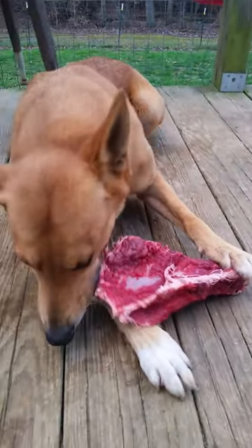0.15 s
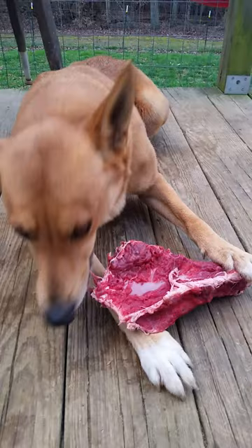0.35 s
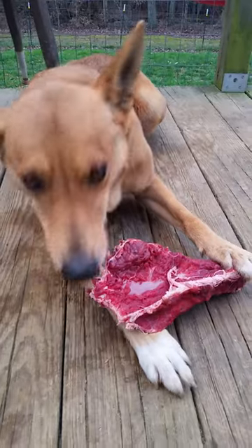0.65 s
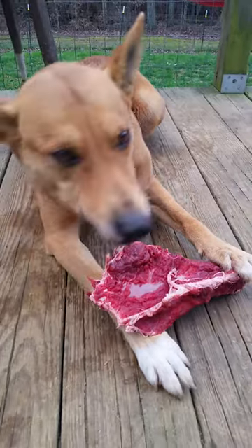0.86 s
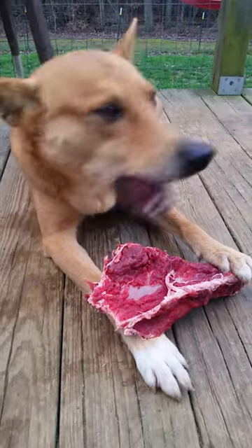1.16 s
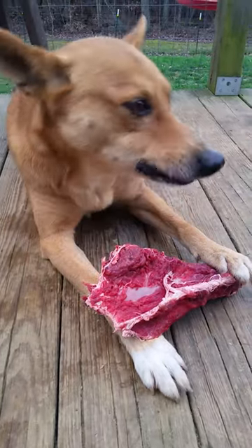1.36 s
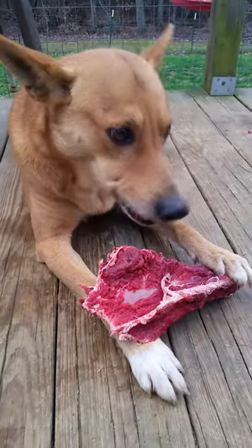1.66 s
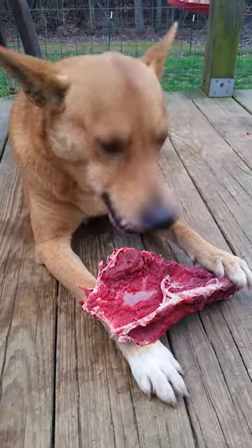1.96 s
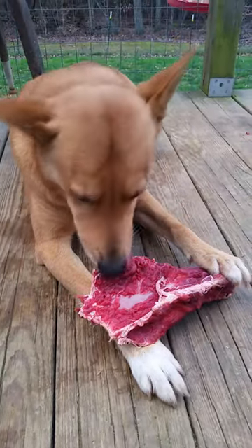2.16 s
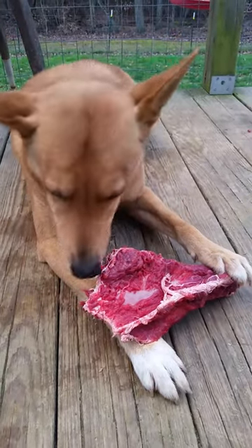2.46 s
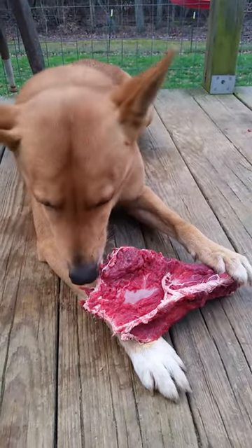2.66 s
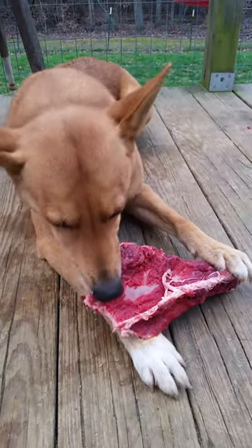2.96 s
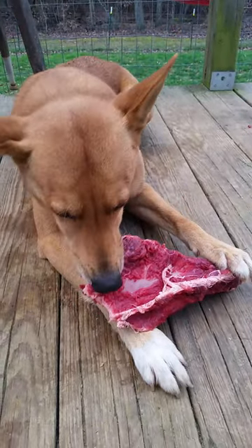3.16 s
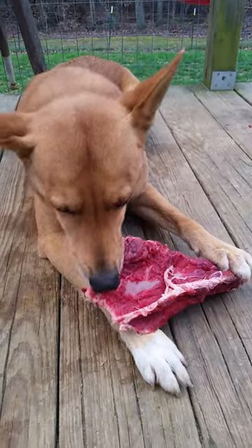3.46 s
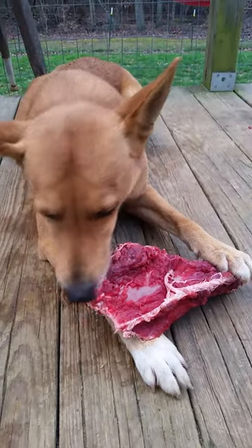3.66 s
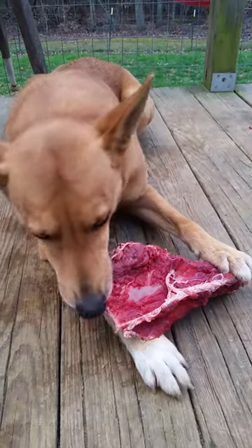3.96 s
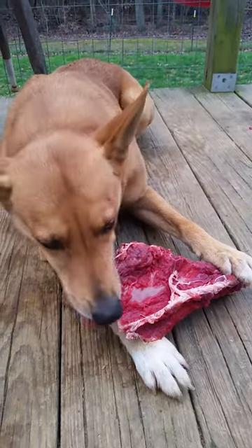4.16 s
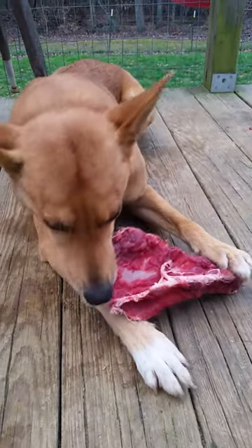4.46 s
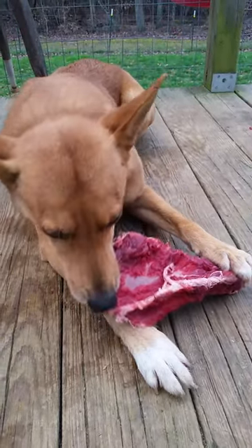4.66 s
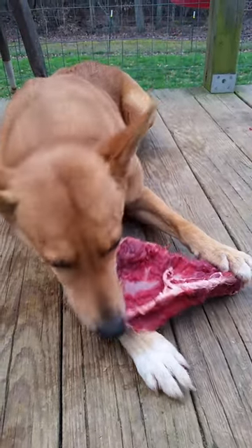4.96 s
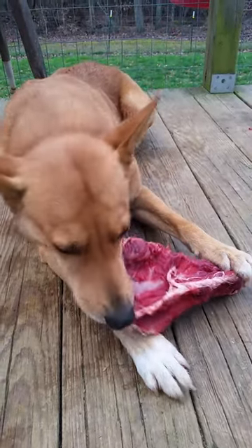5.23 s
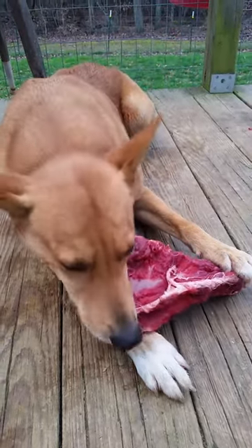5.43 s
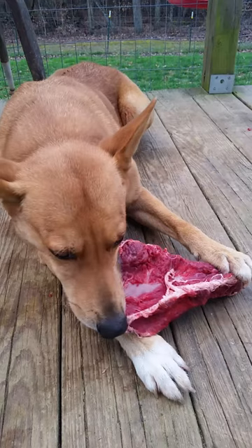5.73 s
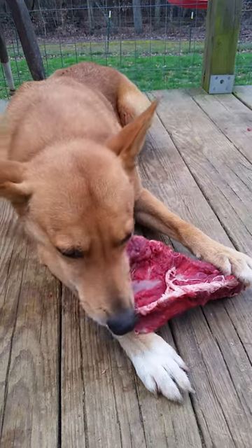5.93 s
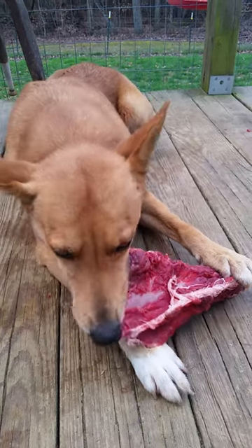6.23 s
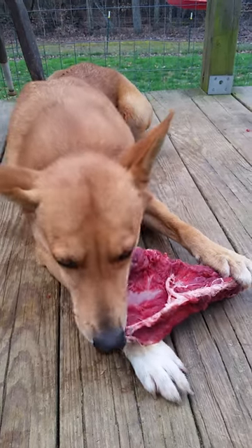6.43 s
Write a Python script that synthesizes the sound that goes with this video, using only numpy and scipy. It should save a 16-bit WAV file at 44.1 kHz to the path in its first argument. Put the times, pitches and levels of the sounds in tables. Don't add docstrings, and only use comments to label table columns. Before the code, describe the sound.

Close, dry outdoor sound of a dog gnawing a raw bone on wooden planks, with a very faint, low outdoor hush behind. From 0 to 0.6 s, dense, rapid low thuds shake the deck, with hollow tooth knocks, a brief scrape and bright wet smacks. Further clusters come at about 0.9, 1.3 and 1.95 s, with sharp little tooth clicks and sticky crackle between. From 2.1 to 2.9 s it eases to soft bumps and fine spit ticks. At 3.0-3.2 s a strong burst of gnawing thumps, knocks and a juicy smack. Then sparse muffled bumps; a low, breathy sniff at 4.3 s leads to two hard, splintering bone cracks at 4.47 and 4.51 s, the second louder. Afterwards light nibbles, thin moist ticks and a barely audible sniff at 4.9 s; small knocks around 5.3, 5.7 and 5.9 s, a short sniff at 6.5 s and a final tooth click near 6.6 s.

```python
import sys
import numpy as np
from scipy import signal
from scipy.fft import rfft, irfft
from scipy.io import wavfile

SR = 44100
rng = np.random.default_rng(int(sys.argv[2]) if len(sys.argv) > 2 else 0)


def amplitude_ratio(level_db):
    exponent = np.asarray(level_db, float) / 20
    return 10 ** exponent


def master_out(mix):
    frames = np.transpose(np.atleast_2d(mix))
    ceiling = np.clip(frames, -1, 1)
    pcm = np.round(ceiling * 32767).astype(np.int16)
    wavfile.write(sys.argv[1], SR, pcm)


N = 290619
FFT_SIZE = N + 4096

# frequency in Hz, level in dB per Hz.
WOODS_SPECTRUM = [(25, -3.5), (45, 9.5), (80, 5.5), (118, 5.5), (197, -12), (313, -9.5), (568, -17.5),
                  (766, -23), (3230, -41.5), (5270, -41.5), (6920, -113), (9850, -99.5), (11600, -35.5),
                  (15800, -32), (16150, -65.5)]
# start in seconds, hold in seconds,
# level felt in the planks in dB, level heard in the hollow bone in dB.
BITES = [(0.0, 0.004, -31, -52.5), (0.103, 0.053, -26, -45.5), (0.305, 0.077, -35.5, -59.5),
         (0.417, 0.078, -31, -56.5), (0.52, 0.066, -28, -47), (0.831, 0.078, -34.5, -57.5),
         (0.931, 0.024, -26, -48.5), (1.289, 0.063, -37.5, -56.5), (1.4, 0.065, -40, -55.5),
         (1.574, 0.14, -53.5, -63.5), (1.833, 0.066, -45.5, -59), (1.976, 0.031, -29.5, -53),
         (2.195, 0.064, -50, -74), (2.416, 0.021, -49.5, -65.5), (2.5, 0.0053, -58.5, -59.5),
         (2.831, 0.0087, -44.5, -55.5), (2.975, 0.035, -29.5, -52), (3.063, 0.07, -22.5, -42),
         (3.418, 0.018, -52, -64.5), (3.762, 0.086, -51, -60.5), (4.094, 0.036, -46, -64.5),
         (4.266, 0.0092, -44, -65), (4.507, 0.081, -38, -50.5), (5.256, 0.13, -43, -61),
         (5.629, 0.02, -48.5, -57), (5.714, 0.034, -48.5, -51), (5.854, 0.096, -44.5, -64),
         (6.091, 0.043, -43.5, -58.5), (6.4, .025, -56, -68), (6.462, .012, -54, -66),
         (6.493, 0.016, -52.5, -92), (6.588, .02, -38, -76)]
# frequency in Hz, level in dB, t60 in seconds.
PLANK_MODES = [(105.4, -21.5, 0.3), (160.1, -0.5, 0.23), (216.8, 4.5, 0.083), (259.7, -5.5, 0.15),
               (305.3, -2, 0.11), (417, -30, 0.054)]
# frequency in Hz, level in dB per Hz.
DEEP_SPECTRUM = [(20, -62.5), (36, -35.5), (52, 7), (75, -2), (104, 16.5), (130, 13), (180, -36)]
# start in seconds, peak level in dB, pitch in Hz.
SHOVES = [(0.06, -27, 135), (1.572, -42, 145), (0.29, -22, 163), (3.28, -33, 55), (3.291, -31.5, 170),
          (3.423, -38, 132), (0.86, -24.5, 95), (3.778, -40, 143), (1.304, -21, 154), (0.11, -26, 78),
          (1.639, -25, 105), (1.83, -24.5, 148), (3.8293, -38, 149), (2.37, -31, 166),
          (2.8176, -33.5, 150.5), (4.47, -39.5, 224), (5.3, -29.5, 156), (6.099, -33.5, 155),
          (3.908, -39, 290), (4.013, -31.5, 104), (4.102, -19, 145), (4.256, -34, 207), (4.458, -22.5, 103),
          (4.516, -21, 171), (4.65, -33, 217), (5.245, -34.5, 264), (5.59, -38.5, 325),
          (5.709, -30.5, 303.5), (5.888, -19, 109), (6.488, -37.5, 129)]
# frequency in Hz, level in dB per Hz.
HOLLOW_SPECTRUM = [(300, -41), (420, -3.5), (550, -3.5), (690, 0), (790, -1), (900, -3.5), (1080, -11),
                   (1300, -21), (1800, -48), (3000, -108)]
# frequency in Hz, level in dB per Hz.
RASP_SPECTRUM = [(500, -52.5), (900, -2.5), (1250, -1), (1900, -2.5), (2300, -1.5), (3100, -8.5),
                 (3900, -12), (5100, -9), (6500, -16), (8000, -53)]
# start in seconds, length in seconds, level in dB.
SKIDS = [(.001, 0.0016, -80), (0.15, 0.011, -44), (1.308, 0.012, -61), (2.153, .09, -78.5),
         (2.266, .06, -83.5), (1.15, 0.013, -66), (5.62, .02, -69), (2.999, .008, -56),
         (3.089, 0.023, -62.5), (0.216, 0.0041, -62), (3.218, 0.024, -66.5), (3.428, 0.013, -69),
         (3.829, 0.011, -66), (4.565, .09, -70.5), (4.456, .008, -65), (5.712, 0.02, -72),
         (6.043, 0.0046, -69.5), (6.59, 0.011, -60)]
# start in seconds, hold in seconds, level in dB.
LICKS = [(0.0, 0.055, -58), (0.14, 0.021, -50), (0.27, 0.8, -58.5), (0.74, 0.24, -61), (1.12, 0.16, -61.5),
         (1.28, 0.11, -60), (1.35, 0.35, -61), (1.79, 0.14, -63.5), (1.955, 0.053, -54.5),
         (2.27, 0.082, -73), (2.43, 0.19, -72.5), (2.665, 0.036, -71), (2.805, 0.18, -69),
         (2.995, .015, -52), (3.03, 0.23, -56), (3.44, .09, -68), (3.75, 0.13, -78), (3.9, 0.13, -70),
         (4.105, 0.022, -84), (4.18, 0.39, -71), (4.545, 0.038, -55.5), (4.61, 0.035, -62),
         (4.74, 0.012, -71), (4.9, 0.13, -72), (5.44, 0.027, -75.5), (5.28, 0.12, -70.5),
         (5.61, 0.076, -75.5), (5.7, 0.055, -68.5), (5.87, 0.08, -68), (6.03, 0.035, -65),
         (6.12, 0.038, -64), (6.2, 0.027, -71), (6.355, .035, -71.5), (6.4, 0.063, -71)]
# frequency in Hz, level in dB per Hz.
WET_SPECTRUM = [(5000, -47.5), (7600, -26), (8900, -14), (9800, -12), (10700, 1), (11300, 6.5),
                (12600, -0.5), (14000, -12), (15400, -6.5), (15850, -11), (16150, -45)]
# start in seconds, peak level in dB, duller share in dB.
SMACKS = [(0.1476, -32.5, -9), (0.412, -44.5, -8.5), (0.7526, -40, -28), (0.793, -50, -9),
          (0.8445, -42.5, -10), (0.9784, -50, -9), (1.1483, -54, 6), (1.311, -37, -7), (1.5433, -51, -9),
          (1.5632, -49, -9), (1.6007, -47.5, -1), (6.587, -55, -3.0), (2.4958, -50, -8.5),
          (2.6614, -62, -2.5), (2.8236, -41, -17), (3.0041, -25, -21), (3.4265, -56, -14),
          (3.828, -51, -25), (3.9716, -55, -6.5), (4.5521, -42, -19), (4.5815, -47, -7),
          (4.6165, -38.5, -32), (4.6397, -42, -12), (4.7563, -50.5, -3.5), (4.9885, -50, -21),
          (5.614, -43.5, -3)]
# start in seconds, peak level in dB.
POPS = [(0.07, -55), (0.1031, -47.5), (0.733, -58), (0.741, -49), (0.895, -46.5), (1.1026, -52),
        (1.2243, -38.5), (1.273, -40.5), (1.768, -58), (1.948, -59), (2.538, -52.5), (2.5486, -42.5),
        (2.585, -55.5), (2.6723, -51.5), (2.801, -43), (2.9303, -47.5), (3.4878, -43), (3.5163, -53),
        (3.9063, -42.5), (4.0998, -55), (4.1807, -51.5), (5.167, -59), (5.775, -61), (5.829, -63),
        (5.94, -53.5), (6.0285, -43), (6.296, -52.5), (6.378, -53)]
# time in seconds, gain of the highest hiss in dB.
FACING = [
    (0, 2),
    (1.2, 2.5),
    (2.2, -3.0),
    (3.4, -5.0),
    (4.1, 1.5),
    (4.6, -0.5),
    (5.1, 3.0),
    (6.6, 6.0),
]
# start in seconds, peak level in dB, pitch in
# Hz.
TEETH = [(0.095, -43.5, 920), (0.116, -38, 634), (0.443, -43, 605), (0.545, -42, 780), (0.56, -34.5, 627),
         (0.922, -33, 760), (0.97, -52, 1010), (1.306, -36.5, 703), (1.415, -32.5, 715),
         (1.948, -39.5, 650), (2.206, -52.5, 680), (2.499, -42.5, 688), (2.826, -45.5, 630),
         (3.002, -41, 667), (3.064, -27.5, 710), (3.092, -26.5, 693), (3.431, -46.5, 700),
         (3.782, -43, 760), (5.285, -45, 705), (5.356, -49.5, 800), (5.591, -50, 596), (5.613, -46, 900),
         (5.688, -44, 795), (5.713, -38.5, 677), (5.89, -47.5, 766), (6.032, -45.5, 830), (3.034, -44, 900),
         (5.325, -49, 690), (6.583, -33, 724),
         (.0005, -38, 1000), (0.217, -45, 1280), (0.336, -36, 1280), (0.355, -41.5, 1280),
              (0.771, -42.5, 3160), (0.769, -41, 5000), (1.102, -50, 1500), (1.146, -41, 3340),
              (1.146, -36, 5330), (1.148, -44, 1930), (1.229, -42.5, 1270), (1.311, -50, 1530),
              (1.54, -40.5, 6240), (1.582, -42, 1120), (1.596, -45, 4500), (1.614, -42.5, 1145),
              (1.619, -50.5, 5150), (1.63, -40, 1175), (3.002, -35.5, 1750), (3.058, -36.5, 1510),
              (3.09, -32.5, 1170), (3.969, -57, 2000), (0.375, -48, 1370), (5.614, -50, 4400),
              (5.716, -47.5, 1930), (5.854, -46, 14800), (5.89, -48.5, 13700), (6.371, -44, 14800)]
# start in seconds, peak level in dB, pitch in Hz.
NIBBLES = [(0.001, -38, 600), (0.856, -48, 1200), (0.89, -45, 732), (1.104, -52, 2200),
           (1.147, -43.5, 1400), (1.198, -50, 850), (1.262, -52, 1290), (1.375, -47, 900),
           (1.597, -46, 1120), (1.972, -45, 616), (2.012, -52.5, 3400), (2.981, -42, 620),
           (3.002, -42, 2390), (3.48, -55, 760), (3.831, -51, 783), (4.522, -33.5, 800),
           (5.294, -42.5, 740), (5.64, -49, 700), (5.725, -49, 2500), (5.75, -50, 850), (5.981, -51, 860)]
# start in seconds, peak level in dB, pitch in Hz.
JOLTS = [(0.084, -32, 186), (0.103, -23.5, 223), (0.119, -15.5, 230), (0.135, -21, 205.4),
         (0.152, -27.5, 221), (0.168, -28.5, 220), (0.292, -29.5, 212), (0.303, -31, 209),
         (0.328, -34, 210), (0.358, -34, 180), (0.374, -36.5, 180), (0.416, -31.5, 200),
         (0.431, -19.5, 224.5), (0.448, -22, 224), (0.464, -31, 215), (0.511, -25.5, 182),
         (0.523, -22.5, 194.5), (0.536, -14.5, 198.5), (0.561, -20.5, 178), (0.576, -16.5, 234),
         (0.596, -30.5, 227), (0.611, -34, 203), (0.828, -32, 247), (0.856, -31, 215), (0.919, -27.5, 208),
         (0.941, -20, 243.5), (0.958, -21, 218), (1.004, -30, 201), (1.022, -31.5, 212), (1.275, -32, 208),
         (1.311, -20.5, 204.5), (1.33, -29.5, 166), (1.413, -27.5, 224), (1.425, -32, 196),
         (1.831, -34, 192), (1.847, -33.5, 178), (1.943, -17.5, 247), (1.96, -19, 220), (1.973, -31.5, 206),
         (1.985, -25, 274), (1.997, -24.5, 215), (2.012, -25.5, 205), (2.969, -34, 256), (2.986, -16, 245),
         (3.004, -19, 217), (3.019, -26, 210), (3.032, -31, 272), (3.058, -23.5, 238), (3.074, -25.5, 209),
         (3.087, -26.5, 262), (3.099, -16, 211), (3.116, -22.5, 235), (3.14, -18.5, 230), (3.16, -28, 204),
         (3.181, -32, 227.5), (3.194, -30.5, 189), (4.105, -30, 175.4), (4.123, -34.5, 171.6),
         (4.522, -29, 253.4), (5.892, -29.5, 214)]
# start in seconds, level in dB.
SPIT_THREADS = [(0.483, -46), (0.697, -49.5), (0.849, -42.5), (0.8613, -40), (0.8794, -54), (0.9472, -47),
                (1.2177, -55), (1.2527, -49), (1.4128, -50), (1.5075, -57), (1.6418, -53), (1.684, -59),
                (1.8064, -53), (1.8323, -50), (1.8998, -59), (2.0128, -49), (2.2059, -67), (2.2844, -62),
                (2.3347, -59), (2.3406, -60), (2.4363, -66), (2.4418, -57), (2.4758, -66), (2.5679, -55),
                (2.6889, -56), (2.7474, -63), (2.7665, -63), (2.8699, -48.5), (3.3641, -59), (3.4713, -68),
                (3.591, -64), (3.6774, -64), (3.772, -60), (3.8558, -53), (3.8926, -63), (3.9397, -69),
                (3.9905, -55), (4.0218, -65), (4.1239, -61), (4.2046, -56), (4.313, -59), (4.5574, -47),
                (4.7443, -61), (4.8372, -63), (4.8424, -60), (4.8908, -66), (4.9184, -62), (5.0054, -60),
                (5.1007, -57.5), (5.174, -58), (5.2921, -50), (5.4654, -62), (5.6522, -57), (5.6767, -64),
                (5.6858, -62), (5.9338, -52), (6.2604, -53.5), (6.3121, -60), (6.4518, -53.5),
                (6.5796, -63)]
# start in seconds, hold in seconds, level in dB, first resonance in Hz.
SNIFFS = [
    (4.306, 0.13, -62, 967),
    (4.901, 0.063, -77.5, 1364),
    (6.503, 0.047, -65, 868),
]
# start in seconds, peak level in dB, splintering in seconds.
CRACKS = [
    (4.466, -17, 0.00095),
    (4.5141, -14, 0.00086),
]
# frequency in Hz, level in dB, t60 in seconds.
BONE_MODES = [(800, 3, 0.034), (950, -6.5, 0.015), (2370, -5.5, 0.0048), (4040, -5, 0.004),
              (5250, -6, 0.0021), (6600, -17, 0.0023), (9100, -15, 0.0039), (13000, -4, 0.0024),
              (11070, 4, 0.0022), (14800, -3, 0.0048)]
# frequency in Hz, likeness from 0 to 1.
LIKENESS = [(40, 0.89), (200, 1), (400, 0.75), (800, 0.5), (1300, 0.25), (2000, 0.14), (4000, 0.078)]
# frequency in Hz, left minus right in dB.
PORT_DIFFERENCE = [(60, -2.5), (200, -1.26), (1000, 0.5), (2200, 3.5), (3400, 2.5), (5000, 13.5),
                   (6400, 10), (7600, 17.5), (8800, -5.5), (10000, 4.5), (11200, -21.5), (13000, -5.5),
                   (14500, -1), (15500, -13)]


def rms_one(x):
    return x / np.sqrt(np.mean(x ** 2) + 1e-20)


def peak_one(x):
    return x / np.abs(x[0]).max()


def filtered(x, order, hz, kind="low"):
    return signal.sosfilt(signal.butter(order, hz, kind, fs=SR, output="sos"), x)


def at_hz(points):
    hz = np.maximum(np.fft.rfftfreq(FFT_SIZE, 1 / SR), 10)
    table_hz, value = np.array(points).T
    return np.interp(np.log(hz), np.log(np.maximum(table_hz, 10)), value)


def colour(x, gain_db):
    cepstrum = irfft(gain_db * np.log(10) / 20, FFT_SIZE)
    cepstrum[1:FFT_SIZE // 2] *= 2
    cepstrum[FFT_SIZE // 2 + 1:] = 0
    return irfft(rfft(x, FFT_SIZE) * np.exp(rfft(cepstrum)), FFT_SIZE)[..., :N]


def ring(clicks, hz, t60):
    r = amplitude_ratio(-60 / (t60 * SR))
    w = 2 * np.pi * hz / SR
    return signal.lfilter([0, np.sin(w)], [1, -2 * r * np.cos(w), r * r], clicks + 1e-18)


def grains(per_s, spread_db):
    born = rng.random(N) < per_s / SR
    size = amplitude_ratio(spread_db * np.minimum(rng.exponential(1, N), 4))
    return born * size * rng.standard_normal((2, N))


def patches(per_s):
    slow = filtered(rng.standard_normal(N), 2, per_s)
    return rms_one(amplitude_ratio(2.46 * rms_one(slow)))


def add(out, s, piece):
    i = round(s * SR)
    out[:, i:i + piece.shape[1]] += piece[:, :N - i]


def gestures(rows, rise, sag, fall, tail_db, tail_fall, rest_db):
    t = np.arange(0, N + 64, 64)
    s, hold, db = np.transpose(rows)[:, :, None]
    held = np.clip(t / SR - s, 0, hold)
    after = np.maximum(t / SR - s - hold, 0)
    top_db = db - rise * np.maximum(s - t / SR, 0) - sag * held
    power = amplitude_ratio(2 * (top_db - fall * after)) + amplitude_ratio(2 * (top_db + tail_db - tail_fall * after))
    return np.interp(np.arange(N), t, 10 * np.log10(power.sum(axis=0) + amplitude_ratio(2 * rest_db)))


def wetness():
    return gestures(LICKS, rise=508.5, sag=11.5, fall=421, tail_db=-6.5, tail_fall=86, rest_db=-78)


def knocks(rows):
    out, t = np.zeros((2, N)), np.arange(1600) / SR
    for (s, db, hz), noise in zip(rows, rng.standard_normal((len(rows), 2, 1600))):
        t60 = 0.00092 + 22.5 / hz
        snap = noise * amplitude_ratio(-60 * t / (0.002 + 0.3 * t60)) * np.minimum(t * hz, 1)
        snap = filtered(snap, 2, min(1.7 * hz, SR / 2.5))
        main = peak_one(ring(snap, hz, t60))
        overtone = peak_one(ring(snap, 1.45 * hz, 0.43 * t60))
        add(out, s, amplitude_ratio(db - 1.5) * (main + 0.14 * overtone))
    return out


def close_by(out):
    out[1] -= 0.6 * filtered(out[1], 1, 3000.)
    return out


def woods():
    return amplitude_ratio(-58) * rms_one(colour(rng.standard_normal((2, N)), at_hz(WOODS_SPECTRUM)))


def planks(pushes):
    tugs = [(s, hold, felt_db) for s, hold, felt_db, _ in BITES]
    boom_db = gestures(tugs, rise=563.5, sag=23, fall=296, tail_db=-11.5, tail_fall=67.5, rest_db=-65)
    boom = sum(amplitude_ratio(db) * ring(pushes, hz, t60) for hz, db, t60 in PLANK_MODES)
    boom = filtered(boom, 4, 420.)
    deep = colour(rng.standard_normal((2, N)), at_hz(DEEP_SPECTRUM))
    out = amplitude_ratio(boom_db - 3.0 - 0.37 * np.maximum(boom_db + 40., 0)) * rms_one(boom)
    out += amplitude_ratio(-52.5 + 0.53 * (boom_db + 38.0)) * rms_one(deep)
    t = np.arange(int(.2 * SR)) / SR
    chance = rng.uniform(0, 1, (len(SHOVES), 4))
    for (s, db, hz), (turn, other, detune, upper) in zip(SHOVES, chance):
        swell = (1 - np.exp(-t * hz * 2.45)) ** 2 * amplitude_ratio(db - 5.0 - 60 * t / 0.097)
        phase = 2 * np.pi * (hz * t + np.array([[0], [other]]))
        upper_mode = 0.8 * upper * np.sin(phase * (1.204 + 0.26 * detune) + 6 * turn)
        add(out, s, swell * (np.sin(phase) + upper_mode))
    return out


def gnawing(pushes):
    closings = [(s, hold, heard_db) for s, hold, _, heard_db in BITES]
    hollow_db = gestures(closings, rise=597.5, sag=42.5, fall=364, tail_db=-8, tail_fall=44.5, rest_db=-93)
    bitten = amplitude_ratio(-70 + hollow_db + 55.5)
    licked = amplitude_ratio(-70 + 0.9 * (wetness() + 59.5))
    slips = grains(per_s=1500., spread_db=3.0) + 0.69 * pushes
    hollow = rms_one(colour(slips, at_hz(HOLLOW_SPECTRUM)))
    scratches = patches(29.0) * grains(per_s=10000.0, spread_db=-4.0)
    rasp = rms_one(colour(scratches, at_hz(RASP_SPECTRUM)))
    muffled = filtered(rasp, 2, 1600.)
    skid, t = np.zeros((1, N)), np.arange(3000) / SR
    for s, length, db in SKIDS:
        fade = amplitude_ratio(db - 60 * np.maximum(t - length, 0) / 0.029)
        add(skid, s, fade[None] * np.minimum(t / 0.00086, 1))
    return amplitude_ratio(hollow_db - 6.0) * hollow + bitten * muffled + (licked + skid) * rasp + 0.94 * skid * hollow


def meat():
    bright, dull = np.zeros((2, 2, N))
    smacks = SMACKS + [(s, db, -20) for s, db in POPS]
    t = np.arange(1500) / SR
    decay = amplitude_ratio(-60 * t / .007) + amplitude_ratio(-17 - 60 * t / .055)
    for (s, db, dull_db), noise in zip(smacks, rng.standard_normal((len(smacks), 2, 1500))):
        burst = peak_one(noise * decay) * amplitude_ratio(db)
        add(bright, s, burst)
        add(dull, s, burst * amplitude_ratio(dull_db))
    fizz = rms_one(grains(per_s=1400., spread_db=4.5)) + patches(40) * rng.standard_normal((2, N))
    crackle = rms_one(colour(patches(21.7) ** 1.5 * fizz, at_hz(WET_SPECTRUM)))
    wet = amplitude_ratio(wetness() + 0.5) * crackle + amplitude_ratio(16.0) * colour(bright, at_hz(WET_SPECTRUM))
    facing_db = np.interp(np.arange(N) / SR, *np.transpose(FACING))
    wet = wet + (amplitude_ratio(facing_db) - 1) * filtered(wet, 4, 12500., "high")
    return wet + amplitude_ratio(8.5) * filtered(dull, 2, [1500., 6500.], "band")


def teeth():
    return close_by(knocks(TEETH))


def nibbles():
    return knocks(NIBBLES) * [[1], [0.6]]


def jolts():
    out, t = np.zeros((2, N)), np.arange(4000) / SR
    for (s, db, hz), (turn, other) in zip(JOLTS, rng.uniform(0, 2 * np.pi, (len(JOLTS), 2))):
        swell = (1 - np.exp(-t / 0.0023)) ** 2 * amplitude_ratio(db + 4.0 - 60 * t / 0.054)
        both = np.array([[0], [other]])
        thud = np.sin(2 * np.pi * hz * t + both)
        upper_mode = amplitude_ratio(-7.0) * np.sin(2 * np.pi * 314.5 * t + turn + both)
        add(out, s, swell * (thud + upper_mode))
    return out


def ticks():
    out, t = np.zeros((2, N)), np.arange(400) / SR
    for (s, db), noise in zip(SPIT_THREADS, rng.standard_normal((len(SPIT_THREADS), 2, 400))):
        snap = peak_one(noise * amplitude_ratio(-60 * t / 0.0035))
        add(out, s, snap * amplitude_ratio(db + 18.5) * [[1], [0.5]])
    air = filtered(out, 4, [12500., 15800.], "band")
    return colour(out, at_hz(WET_SPECTRUM)) + amplitude_ratio(-6) * air


def snuffle():
    out, t = 0, np.arange(N) / SR
    flutter = rms_one(filtered(rng.standard_normal((2, 2, N)), 2, 160.))
    for s, hold, db, hz in SNIFFS:
        level_db = gestures([(s, hold, db)], rise=301.5, sag=49, fall=301.5,
                            tail_db=-200, tail_fall=0, rest_db=-200)
        sinking_hz = hz * 2 ** (-1.2 * np.clip(t - s, 0, hold))
        turns = 2 * np.pi * np.cumsum(sinking_hz) / SR
        breath = flutter[0] * np.sin(turns) + 0.2 * flutter[1] * np.sin(2 * turns)
        out = out + amplitude_ratio(level_db + 3) * breath
    return out


def cracks():
    out, t = np.zeros((2, N)), np.arange(4000) / SR
    for s, db, length in CRACKS:
        after = np.maximum(t - length, 0)
        decay = amplitude_ratio(-60 * after / 0.003) + amplitude_ratio(-20 - 60 * after / 0.055)
        splinters = rng.standard_normal((2, 4000)) * decay
        body = sum(amplitude_ratio(mode_db) * peak_one(ring(splinters, hz, t60)) for hz, mode_db, t60 in BONE_MODES)
        body = peak_one(filtered(body, 4, 640., "high"))
        add(out, s, amplitude_ratio(db) * (0.92 * body + 0.044 * splinters))
    return close_by(out)


def scene():
    pushes = grains(per_s=260., spread_db=2.5)
    mix = woods() + planks(pushes) + gnawing(pushes) + meat() + teeth() + nibbles()
    mix = mix + jolts() + ticks() + snuffle() + cracks()
    shared, unshared = rfft(mix, FFT_SIZE)
    alike = np.clip(at_hz(LIKENESS), 0, .99)
    both = np.sqrt(1 + alike) * shared + np.sqrt(1 - alike) * unshared * np.array([[1], [-1]])
    return irfft(both, FFT_SIZE)[:, :N] / np.sqrt(1.5)


def roll_off(x):
    return signal.sosfilt(signal.butter(12, 17180, fs=SR, output="sos"), x)


def record(dry):
    lean_db = at_hz(PORT_DIFFERENCE)
    right_db = -10 * np.log10((1 + amplitude_ratio(2 * lean_db)) / 2)
    ports = np.array([colour(dry[0], right_db + lean_db), colour(dry[1], right_db)])
    ports = signal.sosfilt(signal.cheby2(8, 25, 16800, fs=SR, output="sos"), ports)
    ports = filtered(ports, 5, 36., "high")
    ports = .26 * np.tanh(ports / .26)
    return roll_off(ports)


dry = scene()
out = record(dry)
master_out(out)
```